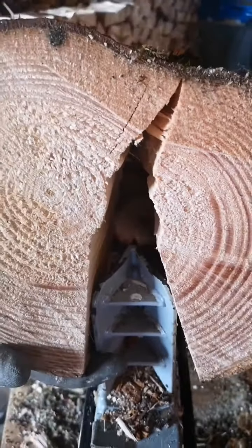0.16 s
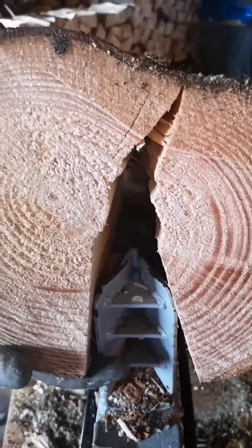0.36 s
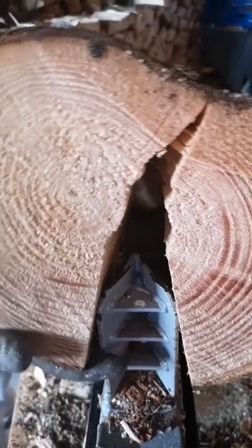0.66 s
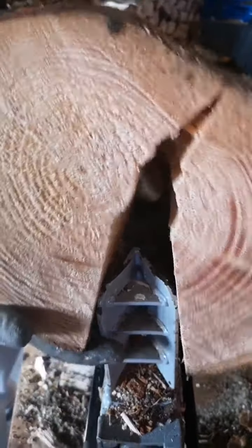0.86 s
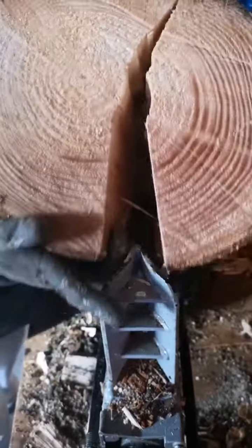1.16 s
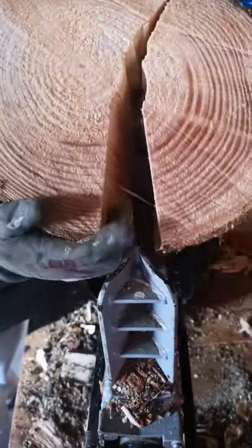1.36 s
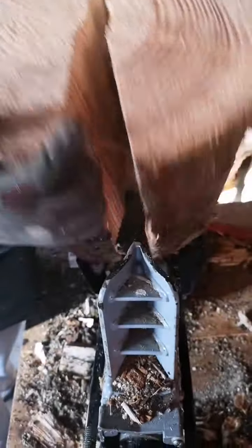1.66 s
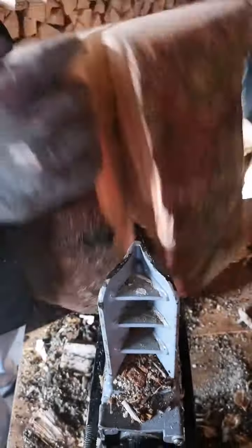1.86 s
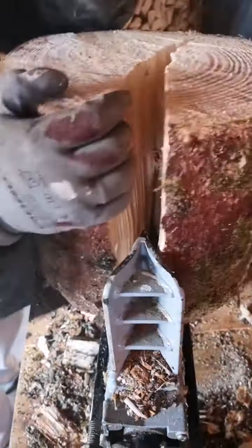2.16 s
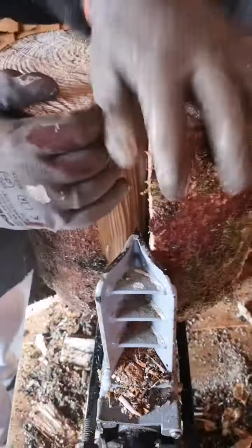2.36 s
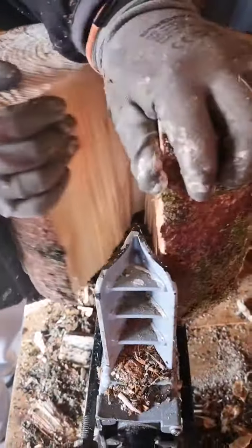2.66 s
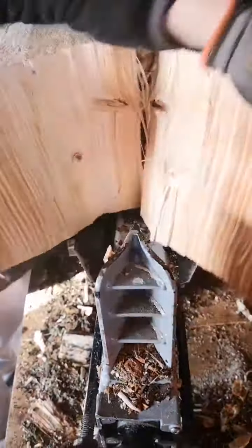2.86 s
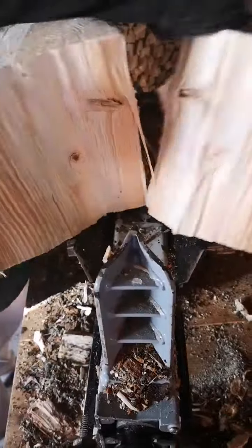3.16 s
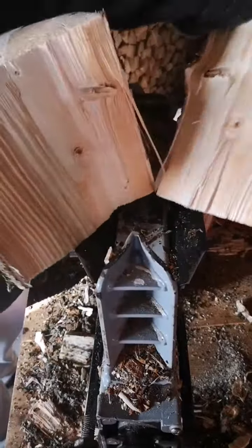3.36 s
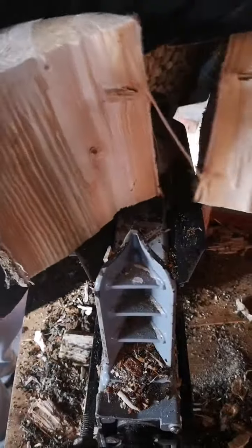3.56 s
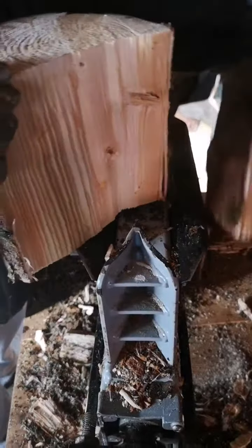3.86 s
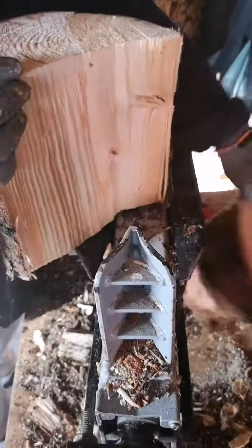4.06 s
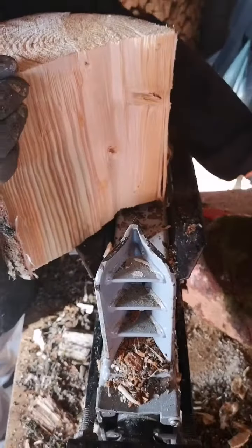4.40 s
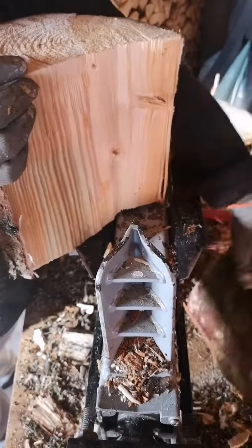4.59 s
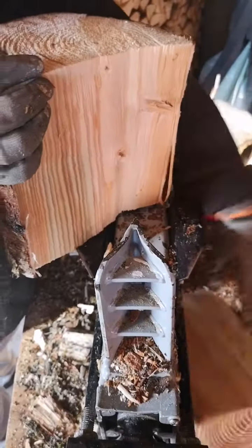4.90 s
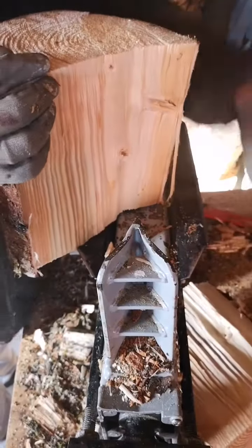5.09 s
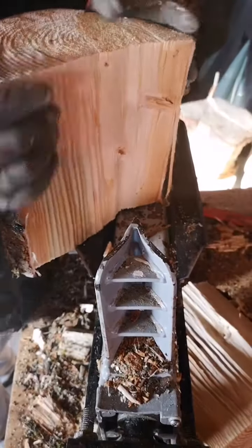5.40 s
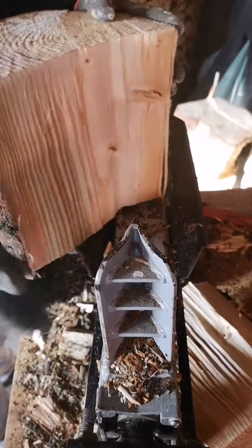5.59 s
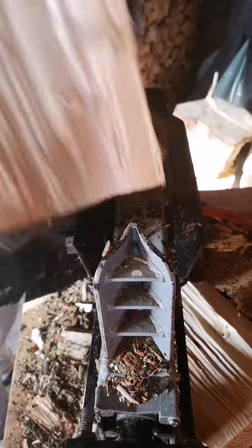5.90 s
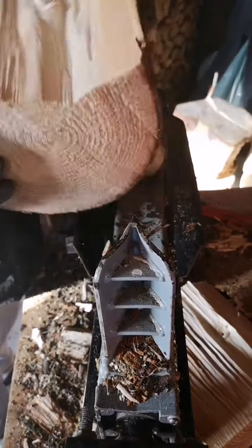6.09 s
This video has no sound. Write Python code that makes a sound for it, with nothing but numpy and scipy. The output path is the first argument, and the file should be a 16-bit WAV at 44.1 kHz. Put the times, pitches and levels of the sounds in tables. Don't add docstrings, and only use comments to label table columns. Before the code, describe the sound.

Gloved hands lift a split log with faint rustles and knocks; it thuds on steel, fibres snap apart, and a half tumbles heavily onto a table.

```python
import sys
import numpy as np
from scipy import signal
from scipy.io import wavfile

SR = 44100
rng = np.random.default_rng(int(sys.argv[2]) if len(sys.argv) > 2 else 0)


def file_out(sig):
    cols = np.atleast_2d(sig).T
    lim = np.clip(cols, -1, 1)
    pcm = np.round(lim * 32767).astype(np.int16)
    wavfile.write(sys.argv[1], SR, pcm)


def amplitude_ratio(level_db):
    exponent = np.asarray(level_db, float) / 20
    return 10 ** exponent


N = 275184
SLOW = np.arange(N // 40 + 2) * 40 / SR


def at_hz(points, hz):
    table = np.array(points)
    return np.interp(np.log(hz), np.log(table[:, 0]), table[:, 1])


def smooth(control):
    return np.interp(np.arange(N) / SR, SLOW, control)


def drift(rate):
    r = np.exp(-80 * np.pi * rate / SR)
    settle = 2000
    noise = rng.standard_normal(len(SLOW) + settle)
    slow = signal.lfilter([1], [1, -2 * r, r * r], noise)[settle:]
    return slow / slow.std()


def clicks(times, gains):
    out = np.full(N, 1e-18)
    np.add.at(out, (np.asarray(times) * SR).astype(int), gains)
    return out


def ring(x, hz, t60):
    r = amplitude_ratio(-60 / (t60 * SR))
    w = 2 * np.pi * hz / SR
    return signal.lfilter([0, np.sin(w)], [1, -2 * r * np.cos(w), r * r], x)


def band(x, low, high):
    return signal.sosfilt(signal.butter(2, [low, high], "band", fs=SR, output="sos"), x)


# pitch_hz, level_db
LEAN = [(200, -0.5), (380, -1.5), (700, -4), (1300, -3.5), (2400, 0.5), (4400, -1.5), (8000, -3),
        (15000, -6)]


def lean(hz):
    return amplitude_ratio(at_hz(LEAN, hz) * np.array([[.5], [-.5]]))


# pitch_hz, likeness (1 is identical)
LIKENESS = [(60, 1), (150, 0.93), (380, -0.13), (950, 0.036), (2380, 0.013), (5980, 0.22), (15000, -0.63)]


def ports(mid, side, hz):
    alike = np.clip(at_hz(LIKENESS, hz), -.99, .99)
    return np.sqrt((1 + alike) / 2) * mid + np.sqrt((1 - alike) / 2) * side * [[1], [-1]]


def struck(hits, modes, contact_s):
    push = np.hanning(int(contact_s * SR) + 3)
    start_s, blow_db = np.transpose(hits)
    blows = np.convolve(clicks(start_s, -amplitude_ratio(blow_db)), push / push.sum())[:N]
    return sum(amplitude_ratio(mode_db) * ring(blows, hz, t60) for hz, mode_db, t60 in modes)


# pitch_hz, level_db, t60_s
FRAME = [
    [(44, -10, 0.081), (74.6, -4.5, 0.19)],
    [(141.5, 2.5, 0.19)],
    [(197.2, -4.5, 0.082), (264.4, -8.5, 0.1), (302.5, -6, 0.16), (405, -16, 0.063)],
]
# start_s, level_db
SWAY_BLOWS = [(0.089, -37), (.518, -28.5), (1.061, -25.5), (1.122, -18.5), (1.144, -27), (1.995, -1.5),
              (2.026, -1), (2.074, -1), (2.143, -11), (2.174, -13), (2.337, -24.5), (2.469, -36),
              (2.98, -27.5), (3.346, -29.5), (3.417, -45), (3.506, -37.5), (4.199, -5.5), (4.221, -7.5),
              (4.283, -22), (4.345, -27), (4.675, -7.5), (4.738, -6.5), (4.795, -20), (4.877, -10),
              (4.944, 1), (5.054, -6), (5.085, -1.5), (5.108, -6), (5.169, -12), (5.284, -32),
              (5.818, -49.5)]
# start_s, level_db
TABLE_BLOWS = [(0.49, -28.5), (0.52, -33.5), (1.061, -41), (1.143, -34.5), (1.194, -28.5), (1.318, -37),
               (1.984, -18), (1.998, -37.5), (2.027, -15.5), (2.073, -8.5), (2.173, -19.5), (2.231, -26.5),
               (2.293, -23.5), (2.336, -32), (2.69, -39), (3.012, -41), (3.212, -42.5), (3.42, -52.5),
               (3.643, -46.5), (4.09, -22.5), (4.105, -5.5), (4.122, -3.5), (4.166, -14), (4.223, -23.5),
               (4.678, -11), (4.738, -15.5), (4.92, -15.5), (4.945, -7.5), (5.003, -29), (5.056, -7),
               (5.11, -12.5)]
# start_s, level_db
LOG_BLOWS = [(.467, -22.5), (1.06, -24.5), (1.144, -23), (1.194, -27), (1.313, -24.5), (1.996, -9.5),
             (2.027, -16), (2.074, -10.5), (2.142, -4), (2.173, -25), (2.232, -23), (2.809, -24.5),
             (2.918, -30.5), (2.999, -34), (3.209, -37), (3.421, -43), (2.341, -30), (2.489, -44),
             (5.82, -51.5), (1.42, -41), (3.302, -34.5), (3.646, -32.5), (3.737, -38.5), (3.994, -32.5),
             (4.088, -11.5), (4.105, -6.5), (4.122, 0.5), (4.163, -12.5), (4.198, -13.5), (4.283, -21.5),
             (4.68, -11.5), (4.707, -18.5), (4.877, -26.5), (4.922, -9), (5.056, -13.5), (5.111, -20)]


def frame():
    bodies = zip([SWAY_BLOWS, TABLE_BLOWS, LOG_BLOWS], FRAME)
    body = sum(struck(blows, modes, 0.004) for blows, modes in bodies)
    small_capsule = signal.butter(3, 48, "high", fs=SR, output="sos")
    body = signal.sosfilt(small_capsule, body)
    earlier_later = np.array([[-1], [1]])
    return body + 7.1 * np.gradient(body) * earlier_later


# pitch_hz, level_db, t60_s
BEAM = [(899, -22, 0.45), (947, 2, 0.2), (1109, -22, 0.41), (1222, -25, 0.92), (1513, -21.5, 0.38),
        (1809, -20, 0.36), (1950, -28, 1.0), (2150, -23.5, 0.7), (2550, -6, 0.37), (2735, -24, 0.42),
        (2920, -20, 0.29), (3354, -36.5, 1.0)]
# pitch_hz, level_db, t60_s
TABLE_TOP = [(420, -4, .2), (517, -6, .16), (818, -4, .15), (960, -5, .12), (1130, -8, .14),
             (1264, -9, .14), (1464, -9, .12), (1561, -7, .12), (1755, -11, .1), (2440, -12, .07)]
# start_s, level_db
BEAM_BLOWS = [(1.982, -39), (2.019, -31.5), (2.07, -36.5), (2.108, -34), (2.146, -30), (2.18, -37),
              (2.31, -48)]
# start_s, level_db
TABLE_TOP_BLOWS = [(4.09, -46), (4.108, -36.5), (4.123, -26.5), (4.2, -35.5), (4.683, -38), (4.92, -42),
                   (5.06, -42)]


def drops():
    most_cycles = 800
    out = np.zeros((2, N))
    for blows, modes in [(BEAM_BLOWS, BEAM), (TABLE_TOP_BLOWS, TABLE_TOP)]:
        start_s, blow_db = np.transpose(blows)
        count = len(start_s)
        for hz, mode_db, t60 in modes:
            for side in range(2):
                chance_db = 2.5 * rng.standard_normal(count)
                gains = amplitude_ratio(blow_db + mode_db + chance_db) * rng.choice([-1, 1], count)
                tone = ring(clicks(start_s, gains), hz, min(t60, most_cycles / hz))
                out[side] += tone * lean(hz)[side]
    return out


# start_s, pitch_hz, level_db, rings_for_s
STEEL_RINGS = [(3.926, 200, -44.5, 0.064), (0.551, 196.3, -52.5, 0.28), (0.552, 392, -61, 0.6),
               (0.56, 437, -63, 0.7), (.56, 290, -62, .5), (.8, 1548, -68, .24), (.93, 1551, -66, .12),
               (.96, 1170, -69, .09), (.6, 830, -68, .44), (1.45, 2400, -69, .08),
               (1.197, 4400, -47, 0.076), (1.198, 1890, -54, 0.11), (1.198, 4720, -47, 0.12),
               (1.4, 2150, -66, 0.12), (1.5, 2870, -67, 0.11), (2.3, 753, -47, 0.083),
               (2.15, 950, -41, 0.13), (2.2, 657, -51, 0.32), (2.2, 423, -48, 0.45),
               (2.25, 1222, -61, 0.32), (2.249, 193.3, -29.5, 0.095), (2.381, 191, -32, .12),
               (2.518, 191.5, -43, 0.19), (2.719, 189, -42, 0.07), (4.2, 820, -34, 0.048),
               (4.129, 4770, -50, .24), (4.128, 3364, -50, 0.27), (4.38, 3364, -68, .09),
               (4.197, 299, -46, 0.24), (4.298, 1222, -63.5, .35)]
# start_s, pitch_hz, level_db, t60_s
WOOD_POCKS = [(.468, 717, -10.5, 0.0176), (.472, 2750, -30, 0.15), (.501, 2765, -51, 0.12),
              (1.064, 2765, -36.5, 0.074), (4.684, 270, -18, .06), (4.684, 960, -26, .06),
              (2.145, 1750, -14, 0.024), (2.145, 340, -9, 0.053), (2.79, 2100, -12, 0.014),
              (2.811, 390, -18.5, 0.024), (2.846, 410, -24, 0.017), (2.8125, 1930, -3, 0.018),
              (4.135, 1500, -23, 0.066), (1.598, 1165, -47, .07), (5.062, 800, -36, .068),
              (3.645, 300, -42, 0.1), (3.9395, 1550, -26, .025), (3.939, 3000, -29, .02),
              (2.8335, 1900, -16, .014), (2.8465, 1300, -16, .025), (1.057, 1650, -38, .03),
              (1.983, 680, -26, .04), (4.001, 270, -34, .06), (2.04, 210, -14, .1), (4.69, 250, -22, .08),
              (3.549, 1700, -38, .03)]
# start_s, pitch_hz, level_db, t60_s
JOLTS = [(2.024, 2770, -24, .09), (2.021, 9300, -27, .07), (2.024, 7550, -29, .06),
         (2.016, 4850, -31, .09), (2.069, 7550, -26, .05), (2.069, 9300, -31, .06),
         (2.071, 2770, -30, .07), (2.114, 2760, -20, .12), (2.118, 6050, -29, .08),
         (2.115, 9300, -33, .09), (2.165, 2780, -33, .15), (2.778, 1850, -29, .12),
         (2.35, 750, -56, .7), (2.33, 660, -46, .2), (4.36, 750, -64, .6), (3.208, 300, -41, .1),
         (4.205, 900, -34, .1), (3.3, 300, -41, .08), (1.19, 330, -38, .12), (4.12, 2900, -26, .04),
         (2.03, 1900, -30, .06), (2.108, 960, -26, .05), (2.016, 850, -28, .05),
         (1.981, 1700, -32, .04), (3.897, 1500, -46, .05), (3.922, 2850, -47, .05),
         (3.96, 2900, -46, .08), (2.915, 1200, -30, .06), (4.435, 2300, -73, .3),
         (4.205, 2700, -42, .06), (1.195, 1950, -48, .08), (4.83, 1650, -56, .08),
         (4.917, 1000, -40, .06), (3.995, 1150, -52, .04)]


def steel():
    rows = [(s, hz, db, 4.2 * lasts, lasts, .004) for s, hz, db, lasts in STEEL_RINGS]
    rows += [(s, hz, db, t60, 0.21 * t60, 0.012 * t60) for s, hz, db, t60 in WOOD_POCKS]
    rows += [(s, hz, db, t60, 0.37 * t60, 0.00083) for s, hz, db, t60 in JOLTS]
    waver = smooth(drift(45))
    out = np.zeros((2, N))
    for s, hz, level_db, t60, lasts, attack in rows:
        turns, place = rng.random(2)
        start = int(s * SR)
        t = np.arange(min(int((lasts + 0.069) * SR), N - start)) / SR
        damped_db = 350 * np.maximum(t - lasts, 0)
        shape = amplitude_ratio(level_db - 60 * t / t60 - damped_db) * (1 - np.exp(-t / attack))
        depth = .35 if lasts < .15 else .15
        unsteady = 1 + depth * waver[int(place * (N - len(t))):][:len(t)]
        rattle_rad = .1 * hz / 1000 if hz > 2000 and lasts < .1 else 0
        rattle = rattle_rad * np.resize(waver[int(place * N / 2)::5], len(t))
        apart = np.arccos(np.clip(at_hz(LIKENESS, hz), -1, 1))
        phase = 2 * np.pi * (hz * t + turns) + rattle + apart * np.array([[0], [1]])
        out[:, start:start + len(t)] += shape * unsteady * np.sin(phase) * lean(hz)
    return out


# start_s, middle_db, low_db, high_db
KNOCKS = [(0.467, -37, -27.5, -64), (1.055, -35.5, -32.5, -44), (1.155, -34, -71, -51.5),
          (1.195, -41, -51, -53), (1.3043, -24.5, -39.5, -42.5), (1.599, -52, -73, -79),
          (1.9756, -25, -23.5, -43), (2.003, -41.5, -33, -53), (2.017, -47.5, -21, -27.5),
          (2.026, -18, -43, -26), (2.067, -33, -25.5, -28.5), (2.1123, -25, -28.5, -32),
          (2.138, -36, -18, -41), (2.677, -33.5, -40.5, -59.5), (3.6396, -40.5, -41, -72),
          (3.9934, -75, -43, -64), (4.089, -35.5, -47, -45), (4.105, -30.5, -16.5, -36),
          (4.1199, -10, -23, -26), (4.6816, -29, -20, -60), (4.913, -29, -35, -39),
          (5.0588, -31.5, -27, -44.5), (5.419, -39, -103, -71), (5.816, -47, -66.5, -49.5)]
# start_s, middle_db, low_db, high_db
SNAPS = [(0.3078, -53, -42, -76), (0.82, -76, -47.5, -54.5), (1.8491, -30, -107, -61),
         (1.8898, -36.5, -82, -49), (2.3073, -40, -69, -36.5), (2.493, -41, -68, -38),
         (2.6247, -43, -51, -41), (2.778, -29, -25.5, -33), (2.7879, -4, -36, -24.5),
         (2.79, -5, -24.5, -28.5), (2.812, 0.5, -19, -6.5), (2.833, -16, -63, -16),
         (2.846, -4.5, -28, -24.5), (2.873, -35, -60, -19), (2.9147, -15, -38, -29.5),
         (3.0671, -26, -53, -23), (3.1036, -24, -59, -31), (3.1807, -18.5, -45, -27.5),
         (3.1946, -19, -46, -23.5), (3.204, -24, -43, -20.5), (3.2574, -43, -65, -24),
         (3.2813, -20.5, -41, -24.5), (3.304, -55, -49, -22.5), (3.313, -29, -40.5, -26.5),
         (3.344, -28, -85, -37.5), (3.448, -80, -61, -38.5), (3.525, -34, -52, -32.5),
         (3.547, -24.5, -62, -32.5), (3.8963, -39.5, -57.5, -35.5), (3.9384, -17, -46.5, -25)]
# start_s, middle_db, high_db
TICKS = [(2.4622, -43, -41.5), (2.547, -62, -54), (2.5914, -55, -59), (2.8082, -8.5, -32),
         (2.843, -24, -19), (2.881, -28, -21), (2.8995, -30, -31), (2.924, -46, -27), (2.9405, -38, -37),
         (2.9617, -36, -29), (3.011, -48, -39), (3.034, -55, -57), (3.1185, -47, -29.5), (3.149, -25, -38),
         (3.1994, -27, -45), (3.2115, -36, -30.5), (3.3079, -36, -26), (3.363, -36, -33.5),
         (3.4812, -64, -51), (3.5088, -38, -38), (3.5909, -67, -42), (3.629, -67.5, -45),
         (3.765, -70.5, -54), (3.7945, -60, -54), (3.8757, -60, -42), (3.9232, -50.5, -44.5),
         (2.89, -35, -28), (2.918, -35, -28), (3.048, -59, -56), (3.165, -36, -43), (3.24, -51, -30),
         (3.4525, -55, -46), (3.532, -47, -34), (3.641, -63, -45), (2.828, -29.5, -31), (3.61, -63, -53)]


def impacts():
    rows = [row + (0.041, 0.0021) for row in KNOCKS]
    rows += [row + (0.0081, 0.00045) for row in SNAPS]
    rows += [(s, middle, -90.5, high, 0.0077, 0.00045) for s, middle, high in TICKS]
    start_s, middle_db, low_db, high_db, t60, attack = np.transpose(rows)
    top_db = high_db - 300 * t60
    zones_db = np.array([low_db + 13.0, middle_db - 10.5, high_db + 6.5, top_db + 13.0])
    t = np.arange(int(.1 * SR)) / SR
    rise = (1 - np.exp(-t / attack[:, None])) ** 2
    return (start_s * SR).astype(int), zones_db, amplitude_ratio(-60 * t / t60[:, None]) * rise


# pitch_hz, level_db (per Hz)
SNAP_COLOUR = [(180, -40), (300, -5), (511, -18.5), (624, -18.5), (814, -12.5), (900, -11), (1460, -9.5),
               (1900, -5.5), (2930, -10.5), (9240, -22.5), (15000, -47.5), (16000, -42)]


def burst_gate(hits, hz, zone):
    starts, zones_db, bursts = hits
    peak_db = [np.interp(zone, np.arange(4), levels_db) for levels_db in zones_db.T]
    own_db = 2.2 * rng.standard_normal(len(starts))
    peaks = amplitude_ratio(np.array(peak_db) + at_hz(SNAP_COLOUR, hz) + own_db)
    length = bursts.shape[1]
    gate = np.zeros(N + length)
    for start, peak, burst in zip(starts, peaks, bursts):
        gate[start:start + length] += peak * burst
    return gate[:N]


# pitch_hz, t60_s
SHED_T60 = [(300, 0.34), (1500, 0.31), (5000, 0.074), (14000, 0.097)]


def shed_tail(gate, hz):
    fade = amplitude_ratio(-60 / (at_hz(SHED_T60, hz) * SR))
    return signal.lfilter([amplitude_ratio(-16.5) * 0.0046], [1, -fade], gate)


# start_s, held_s, low_rub_db, high_rub_db
GRINDS = [(.315, .17, -60, -56.5), (.47, 0.04, -47, -83), (1.07, 0.18, -47, -55.5),
          (1.325, 0.0074, -36, -46.5), (2.0, 0.16, -25.5, -43), (2.69, 0.034, -46.5, -67),
          (2.785, 0.15, -38, -38), (3.945, 0.02, -52.5, -60.5), (3.65, 0.016, -64.5, -99),
          (4.125, 0.043, -27, -46), (4.69, .02, -49.5, -58.5), (4.84, 0.21, -57, -57.5),
          (4.925, 0.013, -53.5, -74), (5.07, 0.049, -52.5, -72), (5.825, 0.0077, -63, -63.5)]
# start_s, held_s, low_rub_db, high_rub_db
STROKES = [(.01, 1, -66, -113), (1.02, 0.007, -64, -61), (1.42, 0.095, -63, -66), (1.9, 0.15, -50.5, -55),
           (2.2, 0.16, -47.5, -61), (2.47, 0.19, -63, -59), (3.0, 0.23, -54, -57.5),
           (3.19, 0.11, -50, -40.5), (3.42, 0.046, -70, -70), (3.55, 0.0032, -51.5, -50),
           (3.94, 0.0085, -51, -53.5), (4.2, 0.11, -39, -61.5), (4.64, 0.04, -50.5, -49),
           (5.53, 0.006, -58, -55), (6.09, 0.0094, -60, -56.5), (6.23, .015, -55.5, -59.5)]


def rubbing():
    out = amplitude_ratio(np.array([-72, -79]))[:, None]
    for rows, rise, fall in [(GRINDS, 6500, 290), (STROKES, 270, 237)]:
        for start_s, held_s, *levels_db in rows:
            before_db = rise * np.maximum(start_s - SLOW, 0)
            after_db = fall * np.maximum(SLOW - start_s - held_s, 0)
            out = out + amplitude_ratio(np.array(levels_db)[:, None] - before_db - after_db)
    return 20 * np.log10(out)


# start_s, effort_db
HANDLING = [(0.0, -51.5), (.95, -56.5), (1.2, -36), (1.44, -55), (1.95, -61.5), (2.15, -35.5), (2.45, -53),
            (2.7, -54), (3.0, -46.5), (3.55, -54), (4.05, -55.5), (4.2, -28.5), (4.5, -53.5), (4.66, -52),
            (4.95, -27.5), (5.2, -44), (5.4, -58.5), (6.24, -64.5)]


def effort():
    start_s, effort_db = np.transpose(HANDLING)
    return np.interp(SLOW, start_s, effort_db)


def dragging():
    on_table_db = -13 * (SLOW > 4.4)
    return -52.5 + 1.5 * (effort() + 42) + on_table_db


def grain():
    catches = np.minimum(rng.exponential(1, N), 6) * (rng.random(N) < .04)
    rough = smooth(amplitude_ratio(0.38 * drift(71))) * amplitude_ratio(2.8 * catches)
    four_a_second = rng.random(N) < 4 / SR
    pops = amplitude_ratio(5.0 * np.minimum(rng.exponential(1, N), 4)) * four_a_second
    return rough * (1 + signal.lfilter([.9], [1, -.98], pops))


# pitch_hz, level_db (per Hz)
RUB_COLOUR = [(150, -31.5), (250, -10.5), (1120, -2.5), (1790, -8), (1980, 2), (3900, 0), (8550, 0.5),
              (14700, -33), (16000, -40)]


def rub_gate(low_rub, high_rub, drag, hz, zone):
    bright = np.clip(zone - 1, 0, 1)
    rub_db = (1 - bright) * (low_rub + 3) + bright * (high_rub + 0.54)
    rub_db = rub_db + at_hz(RUB_COLOUR, hz) + 2.9 * drift(27)
    tearing_db = 8 * ((SLOW > 2.775) & (SLOW < 3.6)) * (hz > 11000)
    return smooth(amplitude_ratio(rub_db + tearing_db) + amplitude_ratio(drag + 14.5) * (hz < 520))


# pitch_hz, level_db (per Hz)
AIR = [(120, -30), (200, -1.5), (245, -6.5), (590, -11.5), (1740, -12.5), (4270, -17.5), (9230, -20.5),
       (14600, -27.5), (16000, -45)]


def wood_and_air():
    hits, (low_rub, high_rub), drag, rough = impacts(), rubbing(), dragging(), grain()
    white = rng.standard_normal((2, 2, N))
    edges = 200 * 2 ** np.arange(0, 6.4, 1 / 3)
    out = 0
    for k, (low, high) in enumerate(zip(edges, edges[1:])):
        hz = np.sqrt(low * high)
        zone = np.interp(np.log(hz), np.log([700, 2000, 6000, 9500, 12000]), [0, 1, 2, 2, 3])
        gate = burst_gate(hits, hz, zone)
        rub = rub_gate(low_rub, high_rub, drag, hz, zone)
        air = amplitude_ratio(-71.5 + 11.0 + at_hz(AIR, hz))
        shaken = white[k % 2] * (13.2 * gate + 14.9 * shed_tail(gate, hz) + rub * rough + air)
        out = out + lean(hz) * ports(*band(shaken, low, high), hz)
    return out


# pitch_hz,
# width_hz, level_db
WOOD = [(627, 13, -21), (819, 28, -14), (930, 11, -4), (1250, 220, -10.5), (1595, 220, -10),
        (1784, 160, 0.5), (8700, 2100, -4), (15200, 1800, 3.5)]
# pitch_hz, width_hz, level_db
RIBS = [(2770, 45, 3), (6050, 90, -1), (7500, 140, -1), (9300, 160, -1)]


def woody(x):
    on_wedge = np.arange(N) < 2.4 * SR
    touching = x * on_wedge + 1e-18
    out = 0.8 * x
    for rows, shake in [(WOOD, x), (RIBS, touching)]:
        for hz, width_hz, level_db in rows:
            r = np.exp(-np.pi * width_hz / SR)
            poles = [1, -2 * r * np.cos(2 * np.pi * hz / SR), r * r]
            out = out + amplitude_ratio(level_db) * signal.lfilter([(1 - r * r) / 2, 0, (r * r - 1) / 2], poles, shake)
    return out


# pitch_hz, level_db (per Hz)
RUMBLE = [(20, 7), (45, 0), (90, -10.5), (140, -7.5), (220, -15)]


def handling():
    effort_db = effort()
    edges = 18 * 2 ** np.arange(0, 4, .6)
    white = rng.standard_normal((2, 2, N + 9000))
    out = 0
    for k, (low, high) in enumerate(zip(edges, edges[1:])):
        hz = np.sqrt(low * high)
        gain = smooth(amplitude_ratio(effort_db + 20.5 + at_hz(RUMBLE, hz) + 1.0 * drift(11)))
        out = out + gain * ports(*band(white[k % 2], low, high)[:, -N:], hz)
    return out


def scene():
    return frame() + drops() + steel() + woody(wood_and_air()) + handling()


def low_pass(x):
    return signal.sosfilt(signal.butter(12, 16290, fs=SR, output="sos"), x)


def record(dry):
    rounded = 1.576 * np.tanh(dry / 1.537)
    cut = signal.cheby2(10, 50, 16600, fs=SR, output="sos")
    mix = signal.sosfilt(cut, rounded)
    return low_pass(mix)


dry = scene()
out = record(dry)
file_out(out)
```